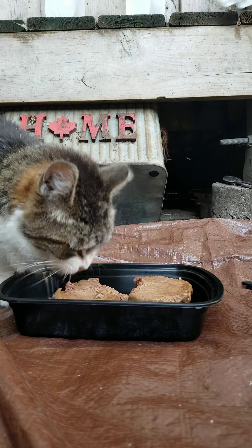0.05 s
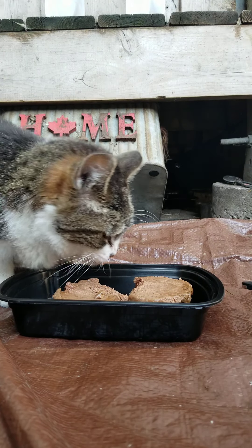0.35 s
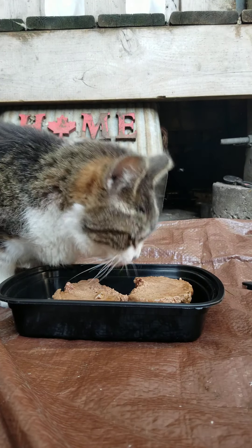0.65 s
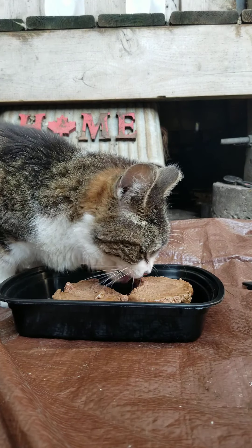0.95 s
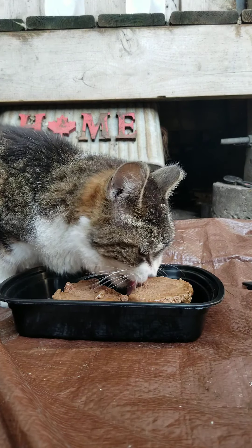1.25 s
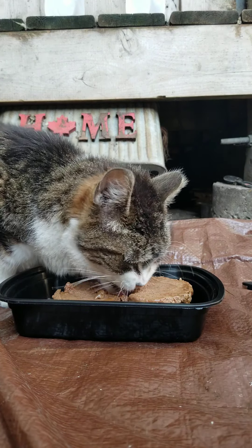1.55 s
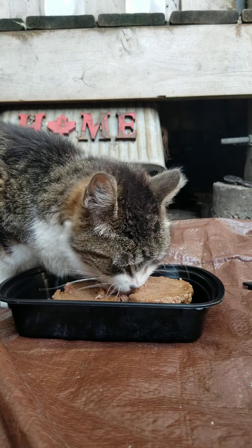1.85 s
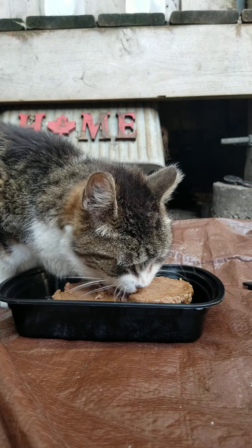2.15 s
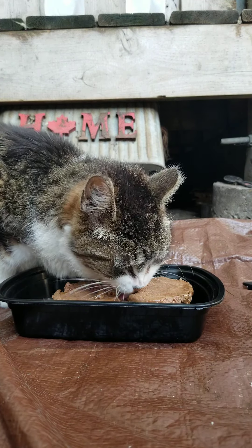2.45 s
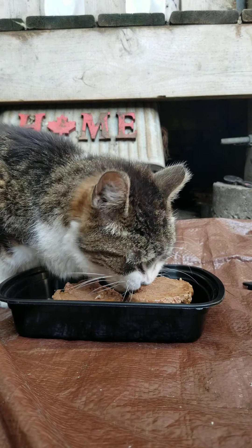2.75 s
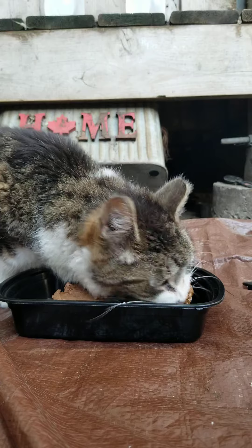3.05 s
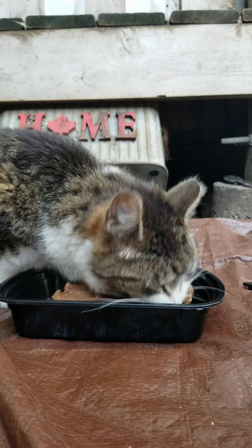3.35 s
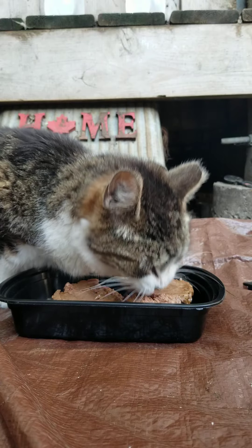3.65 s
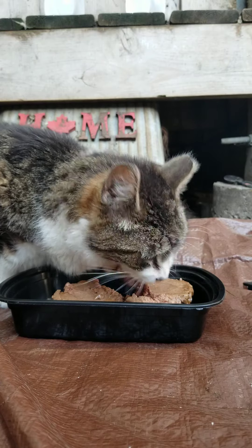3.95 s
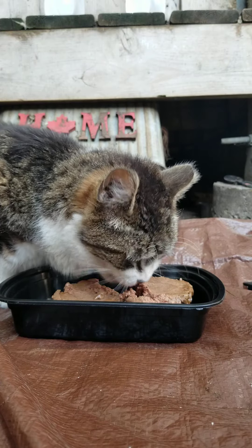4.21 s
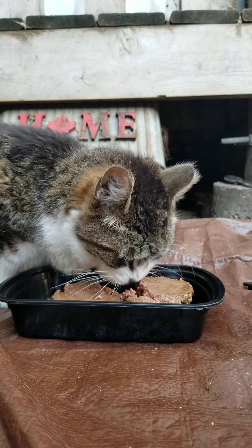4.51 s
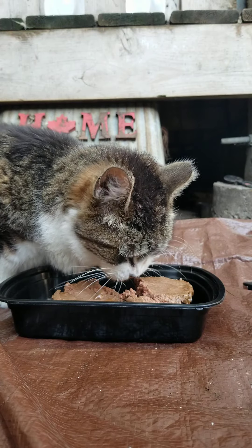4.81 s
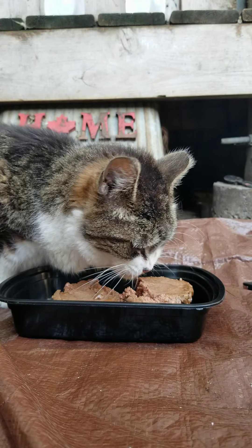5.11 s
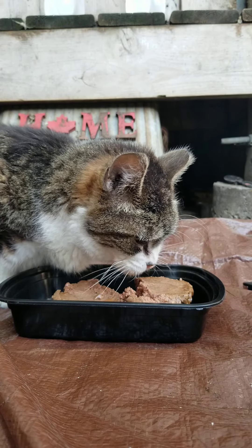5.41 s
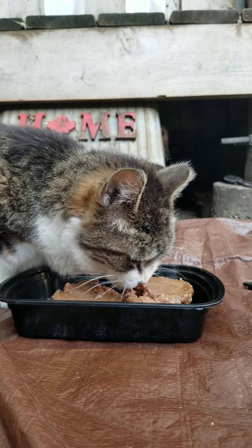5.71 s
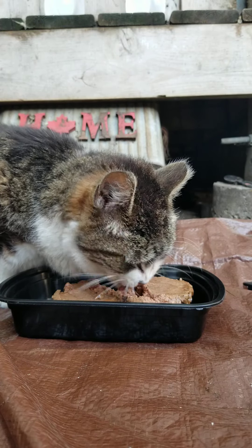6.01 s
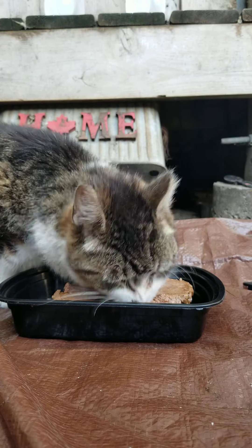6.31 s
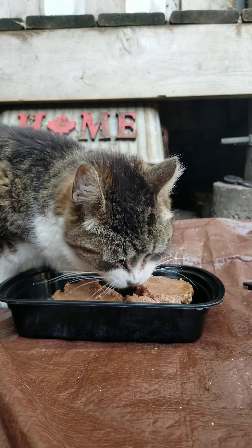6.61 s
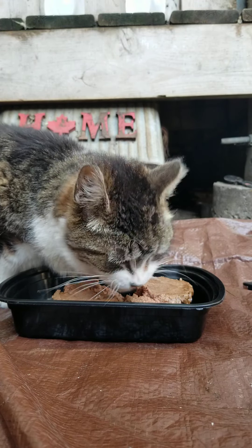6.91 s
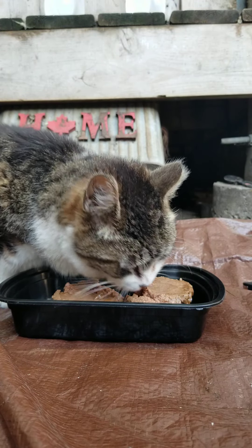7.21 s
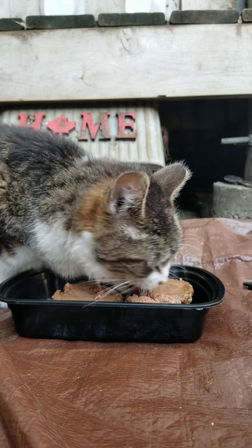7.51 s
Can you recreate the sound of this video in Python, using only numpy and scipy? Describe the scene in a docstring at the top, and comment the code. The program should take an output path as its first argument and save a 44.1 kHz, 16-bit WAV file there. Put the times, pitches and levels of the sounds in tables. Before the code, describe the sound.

Outdoors in a yard, distant traffic rumbles steadily with an engine idling, and tyre noise slowly draws a little nearer. Right by the microphone a cat eats wet food from a tray: first a few short sniffs, licks and crackly bites, then more frequent tongue smacks, saliva clicks and squelchy chewing. Small birds whistle and chirp on and off in the middle distance with a light echo.

```python
"""A cat eats wet food from a plastic tray on a tarpaulin beside a porch, close to the microphones.
It sniffs, licks and bites; saliva snaps, its tongue smacks and air pockets plop in the food.
Further off, small birds whistle, slur and chirp around the yard, echoed by boards and walls.
In the distance an engine idles under a rumble of traffic that slowly draws nearer."""
import sys
import numpy as np
from scipy import signal
from scipy.io import wavfile

SR = 44100
rng = np.random.default_rng(int(sys.argv[2]) if len(sys.argv) > 2 else 0)


def wav_record(signal):
    """Record a signal, one row per channel, as 16-bit PCM in the file named by sys.argv[1]."""
    frames = np.transpose(np.atleast_2d(signal))
    bounded = np.clip(frames, -1, 1)
    # unit amplitude maps onto the largest positive 16-bit level
    quanta = np.round(bounded * 32767).astype(np.int16)
    wavfile.write(sys.argv[1], SR, quanta)


N = 342216
TIME = np.arange(N) / SR


def from_db(db):
    """Decibels to gain."""
    return 10 ** (np.asarray(db) / 20)


def unit_rms(x):
    """Scale to unit power."""
    return x / np.sqrt(np.mean(x ** 2) + 1e-20)


def over_time(curve):
    """Read a curve of (t/s, value) at every sample."""
    return np.interp(TIME, *np.transpose(curve))


def at_hz(curve, hz):
    """Read a curve of (f/Hz, value) on a log-frequency axis."""
    freqs, values = np.transpose(curve)
    return np.interp(np.log(hz), np.log(freqs), values)


def drift(rate_hz):
    """A smooth random wander of unit power."""
    step, settle = 40, 2000
    pole = np.exp(-2 * np.pi * step * rate_hz / SR)
    white = rng.standard_normal(N // step + settle + 2)
    slow = signal.lfilter([1], [1, -2 * pole, pole * pole], white)[settle:]
    return np.interp(np.arange(N) / step, np.arange(len(slow)), unit_rms(slow))


def band(x, low_hz, high_hz, order=2):
    """Butterworth band-pass."""
    edges = [low_hz, min(high_hz, SR / 2 - 1000)]
    return signal.sosfilt(signal.butter(order, edges, "band", fs=SR, output="sos"), x)


def resonate(x, rows):
    """Pass a sound through parallel resonances of (f/Hz, width/Hz, gain/dB)."""
    return sum((-1) ** k * from_db(gain_db) * band(x, hz - width / 2, hz + width / 2, order=1)
               for k, (hz, width, gain_db) in enumerate(rows))


def panned(x, lean_db):
    """Place a sound between the microphones; lean is left minus right level."""
    return x * from_db(np.array([[lean_db], [-lean_db]]) / 2)


def delay_right(x, lag_s):
    """The sound reaches the right microphone a little later."""
    return np.array([x[0], np.interp(TIME - lag_s, TIME, x[1])])


def add(out, start, x):
    """Mix a short stereo sound in at a time in seconds."""
    at = max(round(start * SR), 0)
    out[:, at:at + x.shape[1]] += x[:, :max(N - at, 0)]


def glides(notes, attack_s, tremble_hz, flutter_db, overtones=None, third_db=0):
    """A trembling tone glides through each note: straight at bend 1, early below it, late above it."""
    release_share, full_voice_db = .35, -49   # softer notes have weaker overtones
    out, tremble, flutter = np.zeros(N), drift(tremble_hz), from_db(flutter_db * drift(27))
    for start, length, start_hz, end_hz, level_db, bend, depth in notes:
        on = (TIME >= start) & (TIME < start + length)
        t = TIME[on] - start
        hz = start_hz + (end_hz - start_hz) * (t / length) ** bend
        phase = 2 * np.pi * np.cumsum(hz * (1 + depth * tremble[on])) / SR
        envelope = np.minimum(t / attack_s, 1) * np.sqrt(np.minimum((1 - t / length) / release_share, 1))
        voice = np.sin(phase)
        for multiple, trim_db in ((2, 0), (3, third_db), (4, -12)):
            if overtones and multiple * max(start_hz, end_hz) < SR / 2:
                overtone_db = at_hz(overtones, multiple * hz) + trim_db + min(level_db - full_voice_db, 0)
                voice = voice + from_db(overtone_db) * np.sin(multiple * phase)
        out[on] += np.sqrt(2) * from_db(level_db) * envelope * flutter[on] * voice
    return out


def burst(start, length, level_db):
    """Envelope of a short burst that swells, holds and dies away."""
    t = np.clip((TIME - start) / length, 0, 4)
    attack = np.minimum(t / .23, 1)
    return from_db(level_db) * attack / (1 + t ** 8) * (t < 4)


def grains(per_s):
    """Random impulses, each with its own strength at either microphone."""
    born = rng.random(N) < per_s / SR
    return born * rng.standard_normal((2, N))


def ring(modes, scatter, phase_rad):
    """One touch rings damped modes, shifted by the mouth's shape; each microphone gets its own phase."""
    t, out, rise_s = np.arange(SR // 10) / SR, 0, .00013
    for hz, level_db, t60 in modes:
        phase = 2 * np.pi * hz * (1 + scatter * rng.standard_normal()) * t
        offset = phase_rad * rng.uniform(-1, 1, (2, 1))
        out = out + from_db(level_db - 60 * t / t60) * np.sin(phase + offset)
    return out * (1 - np.exp(-t / rise_s))


# How alike the background is at the two microphones: f/Hz, correlation
BACKGROUND_LIKENESS = [(60, .999), (150, .999), (300, .985), (600, .76), (1000, -.25), (1500, -.6),
                       (3000, -.3), (6000, .05), (15000, .05)]
# Which side it favours: f/Hz, lean/dB
BACKGROUND_LEAN = [(110, 0), (200, -.5), (380, -2), (700, -4.5), (1300, -2), (2400, 0), (4400, 2),
                   (15000, 0)]
def background_noise(spectrum, flutter_db):
    """Noise from all round in fluttering third-octave bands; the channels' mean has unit power."""
    out, edges = 0, 22 * 2 ** (np.arange(30) / 3)
    white = rng.standard_normal((2, 2, N))
    for k, (low, high) in enumerate(zip(edges, edges[1:])):
        hz = np.sqrt(low * high)
        if spectrum[0][0] < high and low < spectrum[-1][0]:
            mid, side = band(white[k % 2], low, high)
            alike = at_hz(BACKGROUND_LIKENESS, hz)
            pair = np.sqrt(1 + alike) * mid + np.sqrt(1 - alike) * side * [[1], [-1]]
            gain = from_db(at_hz(spectrum, hz) + flutter_db * drift(21.4))
            out = out + gain * panned(pair, at_hz(BACKGROUND_LEAN, hz))
    return out / np.std(out.mean(axis=0))


# Faint treble all round the microphones: t/s, relative level/dB
HISS_LEVEL = [(0.0, -64), (.45, -69), (.99, -67), (1.2, -66), (1.43, -65.5), (1.68, -70.5), (1.85, -60.5),
              (2.35, -66.5), (2.79, -69.5), (3.52, -69), (4.26, -67), (6.48, -67.5), (6.98, -64),
              (7.33, -67.5), (7.76, -65.5)]
# Its colour: f/Hz, relative density/dB
HISS_SPECTRUM = [(2500, 15.5), (4000, 9.9), (7000, 6), (9500, 1), (12500, 2.2), (16000, 2.8)]
def hiss():
    """A thin bright hiss swells and sinks behind everything."""
    return from_db(over_time(HISS_LEVEL) + 6.5) * background_noise(HISS_SPECTRUM, flutter_db=3)


# Tyres approaching from far off: t/s, relative level/dB
TYRE_LEVEL = [(0.0, -49.5), (3.37, -49), (5.12, -46), (5.97, -46.5), (7.76, -43.5)]
# Road rumble and tyre noise as they reach the porch: f/Hz, relative density/dB
RUMBLE_SPECTRUM = [(13, -41), (22, -1), (36, -3.5), (55, 6), (65, -0.5), (91, -6), (124, -3.5), (174, -13),
                   (233, -13), (269, -33), (300, -52), (390, -35), (660, -120)]
TYRE_SPECTRUM = [(130, -12), (220, 3.5), (284, -7), (318, -3), (385, -7.5), (459, -9), (621, -14),
                 (956, -12.5), (1100, -20), (1620, -19.5), (4020, -37), (6710, -45), (7870, -55),
                 (10000, -58), (13000, -53), (22000, -120)]
def traffic():
    """Distant traffic: a steady rumble, and tyre noise that grows as it nears."""
    rumble = band(background_noise(RUMBLE_SPECTRUM, flutter_db=-.24), 44.8, 376, order=4)
    tyres = background_noise(TYRE_SPECTRUM, flutter_db=1.5)
    return from_db(-31) * rumble + from_db(over_time(TYRE_LEVEL) + 6.5) * tyres


# Overtones of a distant vehicle pulling away: f/Hz, relative level/dB
VEHICLE_OVERTONES = [(160, -31), (240, -36)]
# Orders of an engine idling beyond the yard: f/Hz, level/dB, waver/Hz
IDLE_ORDERS = [(51.35, -31.5, 3.52), (75.55, -43.5, 2.79), (116.2, -40.5, 3.4), (151, -44.5, 0.79),
               (239.1, -50.5, 3.69)]
def engines():
    """One engine rises in pitch as it pulls away; another idles on wavering orders."""
    pull_away = (5, 1.5, 76.5, 82, -34.5, 1, .0374)   # columns as in SLURRED_NOTES
    hum = glides([pull_away], attack_s=.84, tremble_hz=8.5, flutter_db=2.5, overtones=VEHICLE_OVERTONES)
    for hz, level_db, waver_hz in IDLE_ORDERS:
        phase = 2 * np.pi * np.cumsum(hz + waver_hz * drift(6.27)) / SR
        hum += from_db(level_db) * unit_rms(np.sin(phase) * from_db(2.8 * drift(7.1)))
    return hum


def yard(x, t60_s=.5):
    """Boards and walls scatter the sound: ten feedback delays a side, smeared by allpasses."""
    out = np.zeros((2, N))
    for k, lag in enumerate((rng.uniform(.013, .06, 20) * SR).astype(int)):
        loop, gain = x[k % 2].copy(), from_db(-60 * lag / SR / t60_s)
        for i in range(lag, N, lag):
            loop[i:i + lag] += gain * loop[i - lag:i][:N - i]
        out[k % 2] += (loop - x[k % 2]) * (-1) ** (k // 2)
    for lag in (53, 131):
        taps = np.r_[.5, np.zeros(lag), 1]
        out = signal.lfilter(taps, taps[::-1], out + 1e-18)
    return out / np.sqrt(20)


# A bird off to the right: t/s, length/s, start f/Hz, end f/Hz, level/dB, tremble/share of pitch
THIN_NOTES = [(0, 0.088, 8470, 8500, -48, 0.039), (0.134, 0.071, 8570, 8470, -47, 0.029),
              (0.254, 0.054, 8500, 8480, -46, 0.037), (0.97, 0.091, 8300, 8440, -54.5, 0.057),
              (1.115, 0.054, 7960, 8160, -54, 0.037), (1.18, 0.087, 8530, 8500, -51.5, 0.036),
              (1.924, 0.16, 8430, 8680, -48.5, 0.031), (2.114, 0.23, 8240, 7820, -46.5, 0.024),
              (3.072, 0.046, 8320, 8070, -51.5, 0.043), (3.205, .11, 6900, 8960, -52, 0.019),
              (3.392, 0.094, 8430, 8820, -53.5, .018), (4.073, .039, 8740, 8170, -51.5, 0.046),
              (4.205, 0.085, 6920, 8800, -52.5, 0.019), (4.371, 0.2, 8580, 8070, -49, 0.017)]
def thin_calls():
    """Thin high phrases of short notes, upward flicks and long sinking notes."""
    notes = [(*note, 1, depth) for *note, depth in THIN_NOTES]
    return glides(notes, attack_s=.0022, tremble_hz=390, flutter_db=1.5)


# Whistles across the yard: t/s, length/s, start f/Hz, end f/Hz, level/dB, bend, tremble/share of pitch
SLURRED_NOTES = [(.01, .19, 4750, 4760, -63, 2.8, 0.014), (0, 0.11, 5650, 5550, -63, 2.1, 0.036),
                 (0, 0.17, 3710, 3740, -67, 2.8, 0.01), (.445, 0.055, 2150, 2670, -56, 1.3, .04),
                 (.525, 0.059, 1700, 2140, -50.5, 1.7, .025), (1.155, 0.085, 3940, 3420, -61, 1.25, .025),
                 (1.27, 0.035, 2290, 2050, -57, 1, 0.027), (1.668, 0.15, 5430, 5300, -55.5, 5, 0.012),
                 (1.775, .045, 5180, 3950, -51, 1, .02), (1.81, 0.16, 3880, 3250, -50.5, 3.5, 0.017),
                 (1.968, .095, 3310, 2064, -48.5, 0.86, 0.036), (3.08, .09, 3800, 3350, -63.5, .71, .025),
                 (3.47, 0.031, 6270, 6200, -54.5, 2.8, .015), (3.47, 0.03, 4210, 4140, -51.5, 2.8, .02),
                 (3.505, 0.12, 3780, 3720, -60, 1.3, 0.022), (3.675, 0.029, 7550, 7370, -53, 2, .015),
                 (4.345, 0.091, 6050, 6480, -61.5, 0.49, 0.016), (4.835, .11, 3780, 3500, -63, 0.82, .015),
                 (4.93, 0.059, 3550, 3970, -55.5, 1.7, .015), (5.235, 0.12, 6780, 6440, -64, 2.4, 0.011),
                 (5.325, 0.051, 3000, 3400, -53, 1, 0.033), (5.507, 0.072, 4100, 4130, -47.5, 2.8, .01),
                 (5.565, 0.064, 4460, 4440, -53, 3.1, .025), (6.92, 0.048, 3260, 3180, -53, 2.8, .025)]
# Strength of an overtone where it falls: f/Hz, relative level/dB
SLUR_OVERTONES = [(4000, -20), (5800, -20), (6800, -6), (7450, -5), (8100, -24), (9500, -30), (11000, -11),
                  (12000, -24), (14000, -8)]
def whistles():
    """A bird's nearly pure whistles hold a pitch or slide off it."""
    return glides(SLURRED_NOTES, attack_s=.03, tremble_hz=260, flutter_db=2.8,
                  overtones=SLUR_OVERTONES, third_db=-12)


# Chirps straight ahead, each a flick and three falling steps:
# t/s, length/s, start f/Hz, end f/Hz, level/dB, tremble/share of pitch
HARSH_NOTES = [(5.363, .018, 5000, 7600, -48, .06), (5.37, .032, 3980, 3850, -43.5, .02),
               (5.38, .032, 3750, 3150, -42, .12), (5.403, .046, 3300, 2900, -42.5, .1),
               (7.032, .018, 4600, 6200, -51, .1), (7.041, .028, 4480, 4350, -44, .025),
               (7.053, .034, 3900, 3200, -43.5, .17), (7.076, .038, 3540, 3300, -43, .055)]
# Strength of an overtone where it falls: f/Hz, relative level/dB
HARSH_OVERTONES = [(5500, -16), (7000, -22), (8000, -12), (9000, -14), (10000, -26), (11200, -22),
                   (11900, -7), (13400, -7), (14500, -16), (15600, -4)]
# Resonances of the air in the beak: f/Hz, width/Hz, gain/dB
BEAK_RESONANCES = [(3400, 1600, 5), (6050, 850, 1), (7500, 800, -1), (9200, 410, -7), (12700, 2000, -4),
                   (15400, 600, -11)]
def harsh_chirps(bend=2.2):
    """A rough voice with strong overtones chops a stream of air that hisses through the beak."""
    notes = [(*note, bend, depth) for *note, depth in HARSH_NOTES]
    voice = glides(notes, attack_s=.011, tremble_hz=380, flutter_db=2, overtones=HARSH_OVERTONES)
    air = rng.standard_normal((2, N))
    rasp = resonate(air * voice, BEAK_RESONANCES) / np.std(resonate(air, BEAK_RESONANCES))
    roughness = unit_rms(1 + .6 * drift(300))
    return voice * roughness + from_db(-4.5) * rasp


def birds(wall_echo_s=.19):
    """Birds in the middle distance ring round the yard; a far wall returns the whistles."""
    right = panned(thin_calls(), lean_db=-5)
    slurs = whistles()
    ahead = slurs + harsh_chirps()
    wall = from_db(-11.5) * np.interp(TIME - wall_echo_s, TIME, slurs)
    echoes = yard(from_db(2.5) * right + ahead + wall) + wall
    return delay_right(right, lag_s=.0002) + ahead + echoes


# Soft brushes close by, as of fur and whiskers on the tray: t/s, length/s, level/dB
BRUSHES = [(.59, 0.095, -56), (.68, 0.1, -59), (0.953, .08, -57), (1.21, 0.095, -55.5), (1.56, 0.064, -56),
           (2.76, .32, -64), (3.2, .09, -60), (3.52, .07, -63), (4.22, .1, -59), (6.788, 0.052, -52)]
def rustles():
    """Each brush is a spray of tiny bright ticks that swells and fades."""
    ticks = unit_rms(band(grains(per_s=2800), 11900, 15400))
    return ticks * sum(from_db(level_db) * np.sin(np.pi * np.clip((TIME - start) / length, 0, 1))
                       for start, length, level_db in BRUSHES)


# Sniffs at the food, near the microphones: t/s, length/s, level/dB
SNIFF_PUFFS = [(0.895, 0.056, -42.5), (1.853, 0.04, -42), (2.808, 0.055, -43.5), (3.25, .11, -61),
               (3.628, 0.093, -55), (3.91, .024, -51)]
# The cat's nasal passages: f/Hz, width/Hz, gain/dB
NOSE_RESONANCES = [(1690, 130, 0), (2050, 200, -3), (2520, 220, -4), (3490, 150, -2), (6150, 500, -15),
                   (7550, 700, -14), (8800, 600, -16), (15300, 700, -15)]
def sniffs():
    """Smooth puffs of air pass through the resonances of the nose."""
    air = unit_rms(resonate(rng.standard_normal((2, N)), NOSE_RESONANCES))
    return panned(air * sum(burst(*puff) for puff in SNIFF_PUFFS), lean_db=-1.5)


# Soft licks in the tray, just right of centre: t/s, length/s, level/dB, centre f/Hz
TONGUE_STROKES = [(0.278, 0.028, -50, 2400), (0.994, .025, -52, 1500), (1.211, .022, -51, 900),
                  (3.24, 0.095, -52, 1880), (3.62, 0.077, -52.5, 2000), (4.21, .03, -43.5, 400),
                  (6.295, 0.027, -46, 1100), (6.768, 0.022, -48, 1200), (7.118, 0.013, -44, 7500),
                  (7.461, .014, -45, 850), (7.57, .016, -49, 900), (7.578, 0.14, -51.5, 4600),
                  (7.698, 0.016, -44, 1040)]
def licks():
    """The tongue drags over the food: grainy noise in one broad resonance set by the mouth's opening."""
    rub = rng.standard_normal((2, N)) * from_db(4 * drift(130))
    rub = rub + rub.mean(axis=0)   # narrows the stereo image
    out = sum(unit_rms(band(rub, hz * .6, hz * 1.5)) * burst(start, length, level_db)
              for start, length, level_db, hz in TONGUE_STROKES)
    return panned(out, lean_db=-3)


# Wet ticks at close range, louder as the cat works harder: t/s, level/dB
CHEWING_LEVEL = [(0, -75), (1.2, -66), (2.7, -78), (3.3, -64), (4.9, -61), (6.0, -58), (7.76, -62)]
def squelch(chews_per_s=3, width_hz=450):
    """Each chew squeezes out a clump of tiny wet ticks, which ring at random pitches."""
    chew = np.sin(2 * np.pi * np.cumsum(chews_per_s + .3 * drift(.82)) / SR)
    born = rng.random(N) < 160 * (1 + chew) ** 2 / SR
    ticks = born * from_db(4 * np.minimum(rng.exponential(1, N), 3))
    pitches = np.geomspace(1400, 14500, 16)
    pitch_index, out = rng.integers(0, len(pitches), N), np.zeros((2, N))
    for k, hz in enumerate(pitches):
        radius, angle = np.exp(-np.pi * width_hz / SR), 2 * np.pi * hz / SR
        feedback = [1, -2 * radius * np.cos(angle), radius ** 2]
        rung = signal.lfilter([0, np.sin(angle)], feedback, ticks * (pitch_index == k) + 1e-18)
        pair = np.array([np.roll(rung, rng.integers(12)), rung])
        out += pair * from_db(-4 * np.log2(hz / pitches[0]))
    return from_db(over_time(CHEWING_LEVEL)) * panned(unit_rms(out), lean_db=-2)


# Wet bites at the tray: t/s, length/s, level/dB
BITE_BURSTS = [(1.802, .014, -38), (2.527, .007, -47), (2.551, 0.025, -38), (2.57, 0.015, -39)]
# What a bite rings in the mouth and tray: f/Hz, width/Hz, gain/dB
MOUTH_AND_TRAY = [(900, 310, -1.5), (2480, 200, -1), (2880, 220, -1), (4300, 300, -1), (4950, 230, 0),
                  (5950, 220, 2.5), (8500, 170, -1), (13000, 990, -9), (15400, 500, -12)]
def bites():
    """Wet food tears in a dense crackle that rings the mouth and the tray."""
    crackle = unit_rms(grains(per_s=3000))
    envelope = sum(burst(*bite) for bite in BITE_BURSTS)
    return resonate(crackle * envelope, MOUTH_AND_TRAY) / np.std(resonate(crackle, MOUTH_AND_TRAY))


# Soft plops of food and jaw, just in front of the microphones: t/s, level/dB, f/Hz
AIR_POCKETS = [(1.213, -31.5, 400), (1.808, -36, 546), (4.73, -34, 393), (4.904, -35, 486),
               (5.04, -34.5, 480), (2.57, -42, 802), (5.45, -34.5, 620), (5.829, -38, 765),
               (6.08, -30.5, 454), (6.31, -39, 646), (6.447, -40, 450), (6.602, -30.5, 471),
               (7.122, -39, 998), (7.701, -42, 375)]
def plops(rise_s=.00031, decay_s=.013):
    """Small air pockets open in the food and ring briefly at a low pitch."""
    out, t = np.zeros((2, N)), np.arange(SR // 10) / SR
    envelope = (1 - np.exp(-t / rise_s)) * np.exp(-t / decay_s)
    for start, level_db, hz in AIR_POCKETS:
        plop = from_db(level_db) * envelope * np.sin(2 * np.pi * hz * t)
        add(out, start, panned(plop, lean_db=-1))
    return out


# Smacks of the opening mouth, close up: t/s, level/dB, cavity f/Hz
MOUTH_OPENINGS = [(.297, -41, 3100), (.994, -38, 1540), (3.553, -38, 3720), (3.932, -35.5, 1470),
                  (4.2988, -25.5, 2080), (4.572, -38, 3000), (4.692, -37, 2000), (4.9805, -24.5, 2060),
                  (5.828, -28, 760), (6.271, -36, 1570), (6.31, -37, 1250), (6.782, -28.5, 1260),
                  (7.122, -30, 1010), (7.187, -30.5, 1250), (7.701, -32, 1170)]
# Modes of the mouth cavity: multiple of cavity f, gain/dB, t60/s
MOUTH_MODES = [(.78, -8, .012), (1, -1, .015), (1.4, -12, .012), (1.9, -10, .011)]
def smacks():
    """The tongue leaves the palate in three quick slips; the cavity rings as its opening changes."""
    out = np.zeros((2, N))
    for start, level_db, hz in MOUTH_OPENINGS:
        modes = [(multiple * hz, gain_db, t60) for multiple, gain_db, t60 in MOUTH_MODES]
        for k in range(3):
            slip = from_db(level_db - 7 * k) * ring(modes, scatter=.02 + .1 * k, phase_rad=.6)
            add(out, start + k * rng.uniform(.00156, .00283), panned(slip, lean_db=-2.5))
    return out


def faint_clicks(settled_s=4.4, per_s=5):
    """Rows like LIP_CLICKS for faint, uneven clicks once the cat has settled to its meal."""
    moments = np.arange(settled_s, N / SR, 1 / per_s)
    chance = rng.uniform(-1.1, 1, (len(moments), 2))
    return [(start + jitter / per_s / 2, -52 + 2 * strength, -12, -4)
            for start, (jitter, strength) in zip(moments, chance)]


# Lip and tongue clicks right at the microphones: t/s, relative level/dB, teeth gain/dB, lean/dB
LIP_CLICKS = [(.1799, -44, -14, -7), (.295, -48, -10, -4), (.537, -43, -18, -9), (.557, -41, -22, -1),
              (1.134, -51, -0.5, 2), (1.214, -42, -16, -4), (1.477, -49, -11, -7), (1.765, -52, 1, -1),
              (1.8066, -37, -18, -10), (2.046, -56, 6.5, -3), (2.528, -38, -4, 4), (2.6178, -47, -13, 4),
              (3.0824, -48, -16, -2), (3.1752, -50, -20, -2), (3.2046, -45, -19, -3),
              (3.2499, -44, -13, -4), (3.607, -38.5, -28, -12), (3.7219, -50, -22, -6),
              (3.7923, -52, -18, -7), (3.8472, -50.5, -2, -1), (3.933, -48, -13, -5),
              (4.2472, -41, -10, -4), (4.2757, -51, -18, -5), (4.2992, -45, -12, -5),
              (4.6233, -44, -18, -4), (4.692, -59, -3, -2), (4.9226, -41, -12.5, -4),
              (4.9805, -42, -26, -12), (5.0688, -43.5, -14, -1), (6.064, -46, -13, -1),
              (6.6208, -44.5, -10, -1), (6.782, -46, -9, -1), (6.975, -29, -20, -7), (7.1209, -39, -10, -1),
              (7.5846, -41, -15, -3)]
# Modes of the saliva film and of the gaps between the teeth: f/Hz, gain/dB, t60/s
SALIVA_MODES = [(11670, -1, 0.018), (13470, 6.5, 0.0046), (12700, 7, 0.0028), (14700, 4, 0.0036)]
TOOTH_GAP_MODES = [(4170, 2.2, 0.017), (5500, 13.7, 0.0026), (7670, 17.6, 0.0034)]
def mouth_clicks():
    """A film of saliva snaps against the teeth; five smaller snaps follow as it peels off."""
    out = np.zeros((2, N))
    for start, level_db, teeth_db, lean_db in list(LIP_CLICKS) + faint_clicks():
        delays = np.r_[0, np.cumsum(rng.uniform(.0012, .0045, size=5))]
        for k, delay in enumerate(delays):
            film = from_db(-1.5) * ring(SALIVA_MODES, scatter=.068, phase_rad=1.3)
            teeth = from_db(teeth_db) * ring(TOOTH_GAP_MODES, scatter=.073, phase_rad=2.8)
            add(out, start + delay, panned((film + teeth) * from_db(level_db - 4.4 * k), lean_db))
    return out


def scene():
    """From beside the porch: the cat close by, birds further off, the road behind."""
    mouth = delay_right(mouth_clicks() + smacks() + plops() + licks(), lag_s=.0001)
    cat = mouth + squelch() + rustles() + sniffs() + bites()
    surroundings = yard(from_db(-11) * cat) + birds()
    road = delay_right(traffic() + engines(), lag_s=.00015)
    return cat + surroundings + road + hiss()


def record(dry):
    """The microphone pair feeds a steep low-pass that cuts the very top."""
    cutoff_hz = 15950
    return signal.sosfilt(signal.ellip(12, .1, 90, cutoff_hz, fs=SR, output="sos"), dry)


dry = scene()
out = record(dry)
wav_record(out)
```